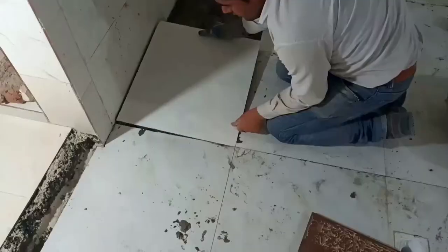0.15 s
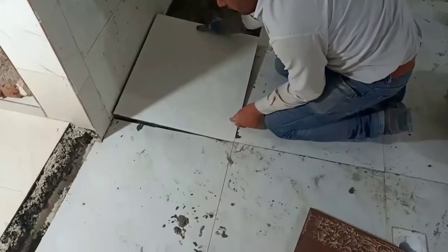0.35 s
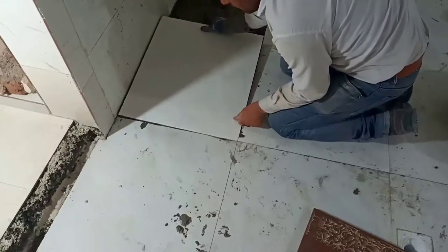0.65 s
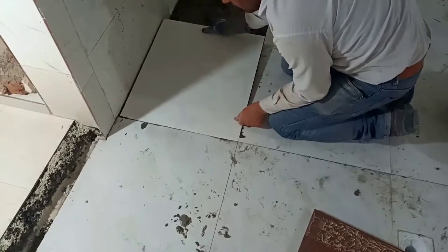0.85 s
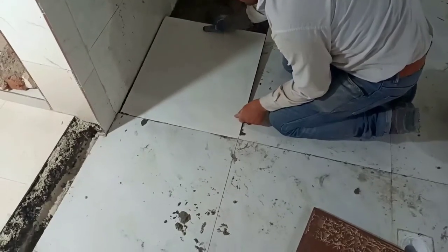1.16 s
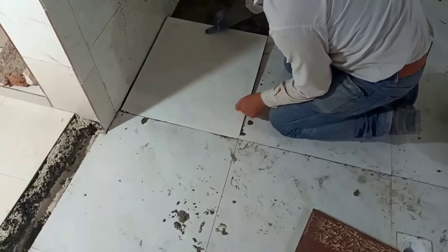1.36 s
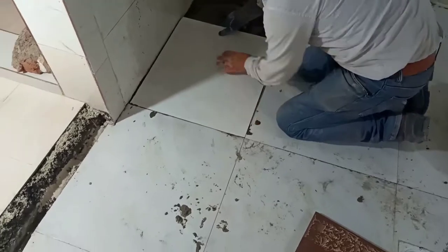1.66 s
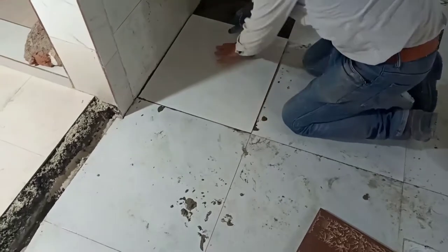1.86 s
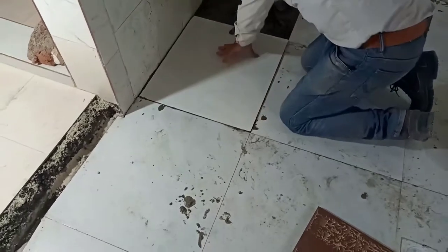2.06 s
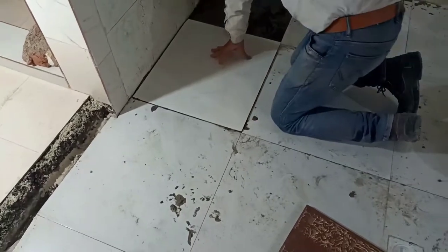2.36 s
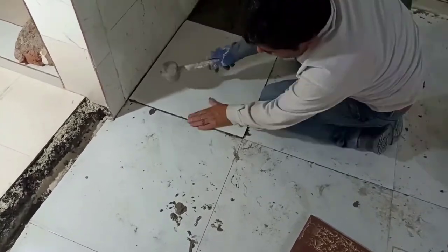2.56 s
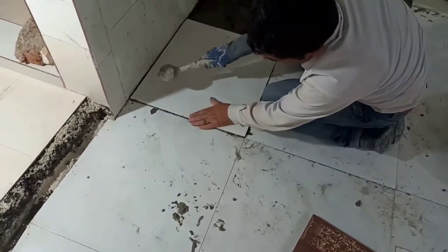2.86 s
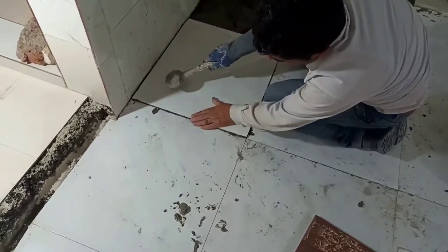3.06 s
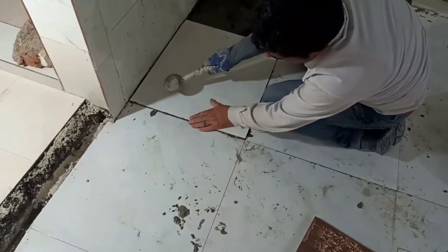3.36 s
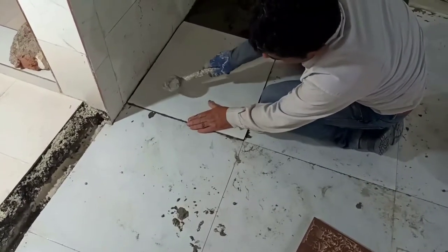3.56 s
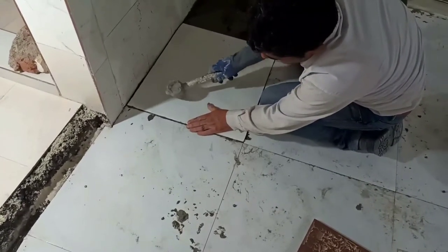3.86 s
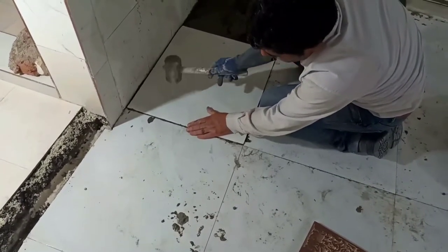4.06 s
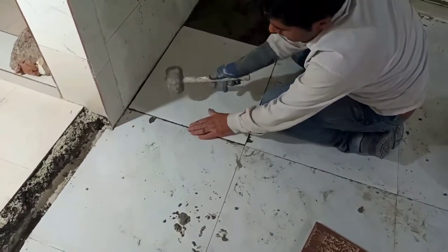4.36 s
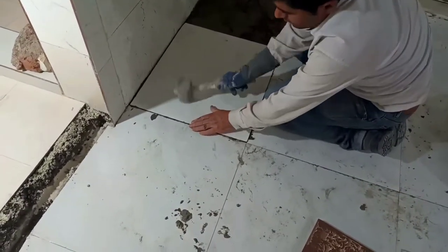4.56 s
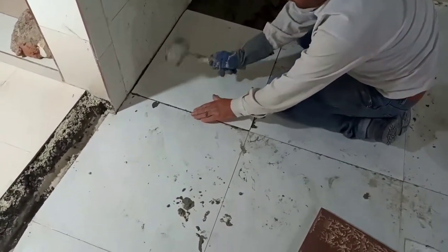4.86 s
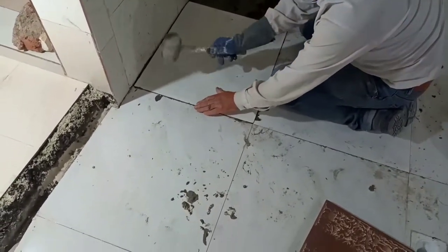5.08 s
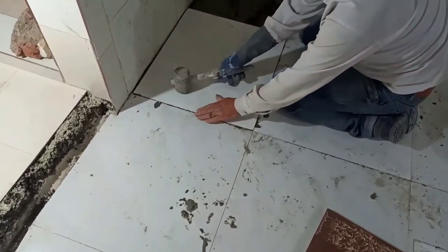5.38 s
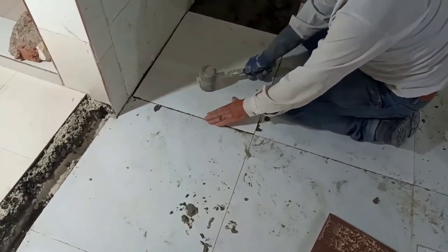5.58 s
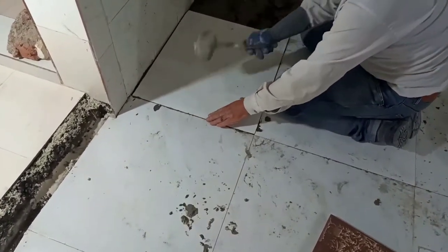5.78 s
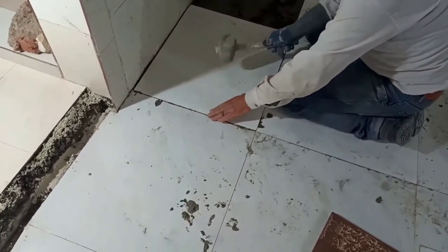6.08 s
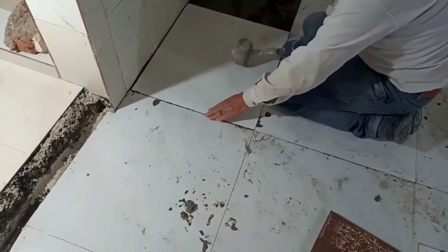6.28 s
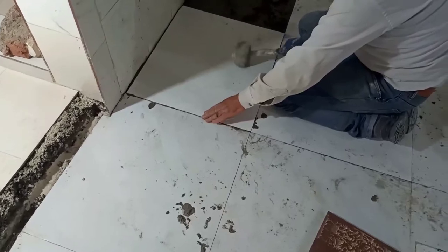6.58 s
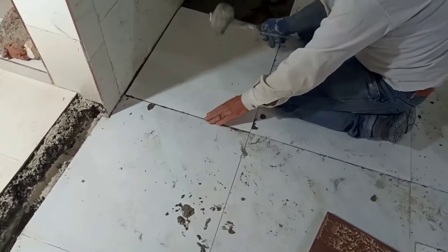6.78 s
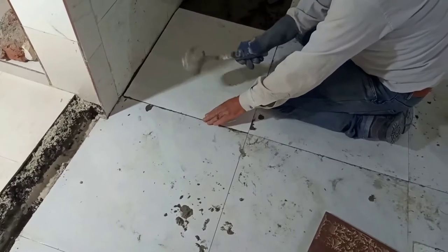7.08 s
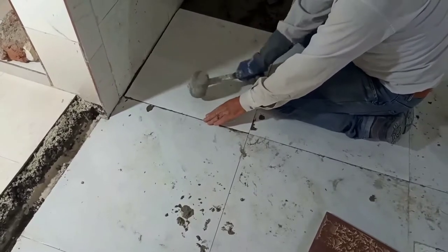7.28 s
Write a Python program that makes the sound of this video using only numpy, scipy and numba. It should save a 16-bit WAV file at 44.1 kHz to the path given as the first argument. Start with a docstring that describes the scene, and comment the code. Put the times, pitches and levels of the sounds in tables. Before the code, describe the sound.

A large ceramic tile grinds over grit, squeaking and clacking, before steady rubber mallet blows knock it into its bed in a bare room.

```python
"""A bare, tiled bathroom. A squeegee swishes briefly over a wet floor; then the scene changes: a large floor
tile is pushed into its mortar bed, grinding on grit, squealing and clacking against its neighbours. A rubber
mallet then taps it down, about three blows a second: the loose tile rocks and rings, the bedded one gives a
dead knock. A limiter flattens the harder blows and lets the room's long ring swell up."""
import sys
import numpy as np
from scipy import signal
from scipy.fft import rfft, irfft
from scipy.io import wavfile
from scipy.ndimage import uniform_filter1d, minimum_filter1d
from numba import njit

SR = 44100
rng = np.random.default_rng(int(sys.argv[2]) if len(sys.argv) > 2 else 0)


def waveform_to_disk(signal):
    """Save audio, clipped to [-1, 1], as 16-bit WAV at the path in sys.argv[1]."""
    frames = np.transpose(np.atleast_2d(signal))
    scaled = np.clip(frames, -1, 1) * 32767
    samples = np.round(scaled).astype(np.int16)
    wavfile.write(sys.argv[1], SR, samples)


N = 327663
T = np.arange(N) / SR

# grit scraped under the raised tile: (frequency [Hz], gain [dB])
SCRAPE_SPECTRUM = [(40, -24), (90, -30.5), (150, 2.5), (220, -7.5), (500, 2), (1000, -10), (1900, -17),
                   (2700, -23.5), (4200, -16.5), (7000, -17), (15000, -28.5)]


def undb(db):
    """Decibels to gain."""
    return 10 ** (np.asarray(db) / 20)


def unit(x):
    """Scale to rms 1."""
    return x / np.sqrt(np.mean(x ** 2))


def fade(t, t60):
    """Decay by 60 dB in t60 seconds."""
    return np.exp(-np.log(1000) * t / t60)


def add(track, s, x):
    """Mix x into the track from time s on."""
    i = max(int(s * SR), 0)
    track[i:i + len(x)] += x[:N - i]


def through(x, response):
    """Pass x through an impulse response."""
    return signal.fftconvolve(x, response)[:len(x)]


def shape(points, size=4096):
    """Minimum-phase impulse response of a (frequency [Hz], gain [dB]) curve."""
    hz, db = np.transpose(points)
    log_hz = np.log(np.fft.rfftfreq(size, 1 / SR) + 1)
    gain = undb(np.interp(log_hz, np.log(hz), db))
    cepstrum = irfft(np.log(gain))
    cepstrum[1:size // 2] *= 2
    cepstrum[size // 2 + 1:] = 0
    return irfft(np.exp(rfft(cepstrum)))


def resonances(modes, size=4096):
    """Impulse response of (frequency [Hz], width [Hz], gain [dB]) modes, silent at 0 Hz."""
    out, t = np.zeros(size), T[:size]
    for hz, width, db in modes:
        ring = np.real((1 + .5j * width / hz) * np.exp((2j * hz - width) * np.pi * t))
        out += undb(db) * 2 * np.pi * width / SR * ring
    return out


def pings(notes):
    """Decaying sines from (time [s], level [dB], pitch [Hz], t60 [s]) rows."""
    out, t = np.zeros(N), T[:SR]
    for s, db, hz, t60 in notes:
        add(out, s, undb(db) * np.sin(2 * np.pi * hz * t) * fade(t, t60))
    return out


def grains(per_s, spread_db):
    """Dense random clicks of uneven size, rms 1."""
    happens = rng.random(N) < per_s / SR
    polarity = rng.choice([-1, 1], N)
    size = undb(spread_db * np.minimum(rng.exponential(size=N), np.pi))
    return unit(happens * polarity * size)


def brighten(x, treble_db, corner_hz=2200):
    """High shelf: sharper contacts have more treble."""
    low = signal.lfilter(*signal.butter(1, corner_hz, fs=SR), x)
    return low + undb(treble_db) * (x - low)


def room_tone(level_db=-56):
    """The still air of the house, a soft steady noise."""
    # colour of the air: (frequency [Hz], gain [dB])
    air_spectrum = [(25, -45), (100, -14), (350, 20), (600, -0.5), (2000, -12), (7000, -16.5),
                    (15000, -18.5)]
    return undb(level_db) * unit(through(rng.standard_normal(N), shape(air_spectrum)))


def reflections(wet_db=-37, standing_db=-70, standing_t60=0.71,
                build_s=0.0031, early_db=-34, early_t60=0.01):
    """The room's answer at one spot: a scatter off the corner, a long diffuse ring, standing waves."""
    # the bathroom's ring: (frequency [Hz], t60 [s], relative level [dB])
    reverb_bands = [(49, 0.43, -14.5), (95, 0.77, 12.5), (182, 1.45, 1.5), (422, 1.27, 2.5),
                    (1113, 1.203, 0), (2000, 1.363, 3.5), (4300, 1.046, -0.5), (7860, 0.8, 1.5),
                    (15000, 0.69, 0)]
    # standing waves between its walls: (frequency [Hz], relative level [dB])
    standing_waves = [(96, -26), (133, 2), (157, 2.5), (189, 2), (235, 16), (281, 2.5), (347, 12.5),
                      (401, 16)]
    t = T[:2 * SR]
    centres_hz, t60s, levels_db = np.transpose(reverb_bands)
    noise = rfft(rng.standard_normal(len(t)))
    log_hz = np.log(np.fft.rfftfreq(len(t), 1 / SR) + 1)
    tail = np.zeros(len(t))
    for pick, t60, db in zip(np.eye(len(centres_hz)), t60s, levels_db):
        band = irfft(noise * np.interp(log_hz, np.log(centres_hz), pick))
        tail += undb(wet_db + db) * band * fade(t, t60)
    for hz, db in standing_waves:
        wave = np.sin(2 * np.pi * (hz * t + rng.random()))
        tail += undb(standing_db + db) * wave * fade(t, standing_t60)
    # small surfaces scatter only the short waves
    scatter = signal.lfilter(*signal.butter(2, 500, "high", fs=SR), rng.standard_normal(len(t)))
    build_up = 1 - np.exp(-(t / build_s) ** 2)
    return (tail + undb(early_db) * scatter * fade(t, early_t60)) * build_up


def bathroom(direct, send, spots=4):
    """Direct sound, near echoes and a reverb that keeps shifting as tiler and microphone move."""
    # echoes off the nearest walls and the kneeling body: (delay [ms], gain [dB])
    echoes = [(5.3, -31.5), (11.4, -14)]
    out = direct.copy()
    for ms, db in echoes:
        add(out, ms / 1000, undb(db) * direct)
    for k in range(spots):
        share = np.sqrt(2 / spots) * np.cos(np.pi * (k // 2 + 1) * T + k * np.pi / 2)
        out += share * through(send, reflections())
    return out


def clothes(band_hz=(90, 165), rub_db=-46, swell_db=-37.5, swell_s=1.79, spread_s=0.053):
    """Clothes rub dully all along, and more as the tiler gets up on his knees."""
    bandpass = signal.butter(2, band_hz, "band", fs=SR, output="sos")
    rub = unit(signal.sosfilt(bandpass, rng.standard_normal(N)))
    swell = np.exp(-((T - swell_s) / spread_s) ** 2)
    return rub * (undb(rub_db) + undb(swell_db) * swell)


def squeegee(swish_db=-41, drop_t60=0.0051):
    """A film of water fizzes under the rubber blade and spits a few drops."""
    # water under the blade: (frequency [Hz], gain [dB])
    swish_spectrum = [(40, -20), (130, -6), (260, 0), (600, -8.5), (1200, -16), (2600, -15.5),
                      (4200, -10.5), (7000, -10.5), (10000, -11.5), (15000, -17)]
    # drops spat from the blade: (time [s], level [dB], pitch [Hz])
    drops = [(.0175, -39, 6800), (0.0963, -26, 6600), (0.128, -29, 2840), (.131, -30.5, 2000)]
    fizz = unit(through(grains(per_s=3200, spread_db=2.5), shape(swish_spectrum)))
    return undb(swish_db) * fizz + pings([(*drop, drop_t60) for drop in drops])


def squeal(attack_s=0.033, release_s=0.054, sag_db_per_s=14, waver=0.0039):
    """The dragged tile sticks and slips on wavering notes that weaken as the drag slows."""
    # stick-slip notes: (time [s], length [s], pitch [Hz], level [dB])
    notes = [(.265, .374, 436, -32), (.255, .15, 668, -32.5), (1.55, 0.2, 352, -34.5)]
    out, t = np.zeros(N), T[:SR]
    for s, length, pitch_hz, db in notes:
        gate = np.clip(np.minimum(t / attack_s, (length - t) / release_s), 0, 1)
        drift = unit(uniform_filter1d(rng.standard_normal(len(t)), size=900))
        phase = 2 * np.pi * np.cumsum(pitch_hz * (1 + waver * drift)) / SR
        add(out, s, gate * undb(db - sag_db_per_s * t) * np.sin(phase))
    return out


def ceramic(contacts, s, uneven_db=1.5, laid_s=1.7, detune=0.05):
    """Tiny contacts at time s ring the tile; each spot favours other resonances."""
    # the ceramic's own resonances: (frequency [Hz], width [Hz], gain [dB])
    tile_modes = [(269, 4.3, 6.5), (334, 50, 0), (676, 146, -0.5), (863, 101, 0.5), (982, 86, -0.5),
                  (1066, 21, -8), (1397, 47, -2.5), (1614, 49, -11), (1753, 8.3, -7.5), (2020, 25, -30),
                  (2315, 23, -5), (2950, 300, -14), (3475, 84, -11.5), (3820, 99, -10.5), (4060, 96, -14.5),
                  (4640, 16, -17), (6250, 26, -11)]
    hz, width, db = np.transpose(tile_modes)
    shift, favour = rng.standard_normal((len(tile_modes), 2)).T
    if s > laid_s:  # on the mortar, each contact finds the tile supported differently
        hz = hz * (1 + detune * shift)
    return through(contacts, resonances(zip(hz, width, db + uneven_db * favour)))


def grinding(ring_db=12, scrape_db=10, settle_db=-16.5, settle_t60=1):
    """Each shove grinds a run of sand grains under the raised tile; a few more settle after it."""
    # shoves over the grit: (time [s], relative level [dB], length [s], treble [dB])
    shoves = [(0.2, -37.5, 0.2, -3.5), (0.258, -37.5, 0.094, -11), (0.395, -39.5, 0.15, -10),
              (0.647, -25.5, 0.034, -21), (0.722, -21.5, 0.025, -6.5), (0.887, -23, 0.029, -7.5),
              (1.174, -38, 0.042, -21), (1.471, -35, 0.2, -9.5), (1.54, -31, 0.029, -10),
              (1.717, -29.5, 0.13, -8.5), (1.769, -33, 0.02, -22), (1.961, -27, 0.033, -10),
              (2.053, -31.5, 0.025, -6), (2.565, -59, 0.15, -6)]
    out, t = np.zeros(N), T[:SR]
    grit, scrape = grains(per_s=1800, spread_db=3.0), shape(SCRAPE_SPECTRUM)
    for s, db, length, treble_db in shoves:
        progress = t / length
        push = 2 * np.e * progress * np.exp(-2 * progress) * np.exp(-(progress / 2) ** 4)
        settle = undb(settle_db) * (1 - np.exp(-progress)) * fade(t, settle_t60)
        grit = np.roll(grit, len(t) // 2)  # other grains for each shove
        contacts = undb(db) * brighten((push + settle) * grit[:len(t)], treble_db)
        add(out, s, undb(ring_db) * ceramic(contacts, s) + undb(scrape_db) * through(contacts, scrape))
    return out


def clacks(ring_db=15, crack_db=-2, rise_s=0.0022, t60=0.029):
    """Ceramic on ceramic: a brief crush of contacts rings the tile a little differently each time."""
    # the edge knocking against its neighbours: (time [s], relative level [dB], treble [dB])
    knocks = [(.649, -27.5, -22), (.656, -18, -23), (.693, -22, -16), (.733, -35, -9), (.9015, -21.5, -6),
              (.908, -15.5, -2), (1.262, -28, -8), (1.275, -26, -19), (1.301, -24, -7), (1.311, -24, -13),
              (1.381, -29.5, -0.5), (1.538, -25, 6), (1.547, -20, 2), (1.569, -23, -8), (1.64, -26, -2),
              (1.734, -28.5, 8), (1.958, -27, 10), (1.978, -21, 4.5), (2.144, -30, 5), (2.156, -33, 6),
              (2.504, -32, 2), (3.182, -18, -8.5), (3.472, -28, 5), (3.752, -28, -0.5), (3.763, -25, -5)]
    out, t, scrape = np.zeros(N), T[:SR // 8], shape(SCRAPE_SPECTRUM)
    envelope = (1 - np.exp(-t / rise_s)) * fade(t, t60)
    for s, db, treble_db in knocks:
        crush = rng.choice([-1., 1.], len(t))
        contacts = undb(db) * brighten(crush * envelope, treble_db)
        add(out, s, undb(ring_db) * ceramic(contacts, s) + undb(crack_db) * through(contacts, scrape))
    return out


def clinks():
    """The tile rings on single notes as an edge catches."""
    # ringing notes: (time [s], level [dB], pitch [Hz], t60 [s])
    notes = [(.655, -36, 229, 0.6), (.655, -26.5, 660.5, 0.5), (.652, -31, 2304, 0.11),
             (.9, -35.5, 228.6, .75), (.903, -22, 1410, 0.06), (.905, -26, 1500, 0.06),
             (1.535, -27, 980, 0.37), (2.86, -37, 2060, .06), (2.868, -27.5, 884, 0.055),
             (2.865, -33.5, 728, 0.08), (2.869, -31, 3130, .022), (3.171, -25, 900, .05),
             (3.172, -26, 1430, .04), (3.176, -32, 1814, .05), (3.468, -27.5, 1430, .04),
             (3.749, -26, 1480, .04), (3.757, -24, 1400, .035), (3.752, -26, 3600, .012)]
    return pings(notes)


def corner_snap(start_s=2.8575, level_db=-23, start_hz=3330, rise_s=0.0011, sag_hz_per_s=97000):
    """A corner snaps against the next tile under the first blow; its pitch sags as the contact eases."""
    t = np.maximum(T - start_s, 0)
    envelope = t / rise_s * np.exp(1 - t / rise_s)
    phase = 2 * np.pi * (start_hz - sag_hz_per_s * t / 2) * t
    return undb(level_db) * envelope * np.sin(phase)


def looseness(s, sinks_from_s=3.85, time_constant_s=0.31, at_last=0.13):
    """How freely the tile rocks at time s: 1 at first, less as it sinks into the mortar."""
    left = np.exp(-max(s - sinks_from_s, 0) / time_constant_s)
    return at_last + left * (1 - at_last)


def rocking(t, loose, rock_hz=177, longest_s=0.016):
    """The slab see-saws until it lands; the firmer its bed, the weaker and shorter the rocking."""
    progress = np.minimum(t / (longest_s * loose), 1)
    arch = 2 * np.sqrt(progress * (1 - progress))
    return -loose * arch * np.cos(2 * np.pi * rock_hz * t)


def chatter(t, loose, bedded_t60=0.073, loose_t60=0.058, flex_hz=185, depth=0.75, rise_s=0.0037):
    """Envelope of an edge touching its neighbour once per flex; it builds more slowly on a loose tile."""
    t60 = bedded_t60 + loose * (loose_t60 - bedded_t60)
    flex = 1 + depth * np.cos(2 * np.pi * flex_hz * t)
    attack = 1 - np.exp(-t / (rise_s * (1 + 2 * loose)))
    return fade(t, t60) * flex * attack


def air_puff(force, s, around_s=4.62, spread_s=0.37, hz=39.7, gain_db=-17):
    """The blows that drive the slab down into the mortar push out a deep puff of air."""
    driven = np.exp(-((s - around_s) / spread_s) ** 2)
    return driven * through(force, resonances([(hz, hz, gain_db)]))


def mallet(knock_db=-10, hollow_db=-5, rocking_db=-9, grit_db=-9, ring_db=-4, open_edge_db=2.5):
    """Rubber blows knock the slab, crunch grit and ring the tile while loose: (direct, reverb send)."""
    # blows: (time [s], force [dB], contact [ms], edge rattle re force [dB], onset re rattle [dB],
    # rattle treble [dB], reverb send [dB])
    blows = [(2.8546, -8.5, 3.1, -2, -19, 1, -1.5), (3.163, -2, 3.7, 1, -30, -4.5, -4),
             (3.4572, -5.5, 4.7, 1, -30, -2.5, -1.5), (3.7365, -4, 3.27, 3.5, -34, -5, -4),
             (4.0238, -7, 7.5, -19, -4, -10, -1), (4.355, 10, 3.3, -19, -11, -9, -6),
             (4.716, 13, 1.7, -29, 7, -27, -6), (5.0492, 27.5, 2.34, -15, -22, -9.5, -3),
             (5.3465, 23, 1.9, -10, -32, -6, -3), (5.628, -2.5, 1.06, -14, -6, -7, 1),
             (6.0968, 14.5, 2.51, -15, -6.5, 0, -2), (6.404, 19.5, 1.76, -8.5, -4, -2.5, -0.5),
             (6.683, 19, 2.43, -17, 0, -1, -2.5), (7.0905, 15.5, 2.56, -11, -7.5, -5, -2.5),
             (7.402, 21, 1.74, -6.5, -12, -0.5, -0.5)]
    # the bedded slab's dead, woody knock, too damped to ring: (frequency [Hz], gain [dB])
    slab_spectrum = [(35, -7.5), (80, -26), (130, -2.5), (185, 6), (270, 5.5), (480, 4), (780, -5.5),
                     (1230, -1.5), (1750, -32), (2250, -18), (3000, -6), (15000, -30)]
    # grit crushed by a blow: (frequency [Hz], gain [dB])
    crunch_spectrum = [(40, -29), (150, -1.5), (450, 6.5), (800, 6.5), (1600, 0), (2700, -6.5),
                       (4200, -1.5), (7000, -5.5), (15000, -15.5)]
    direct, send, t = np.zeros(N), np.zeros(N), T[:SR // 6]
    grit = grains(per_s=7800, spread_db=11.0)
    slab, crunch = shape(slab_spectrum), shape(crunch_spectrum)
    for k, (s, db, contact_ms, rattle_db, onset_db, treble_db, send_db) in enumerate(blows):
        contact_s, loose = contact_ms / 1000, looseness(s)
        # rubber is squeezed faster than it springs back
        squeeze = 4.2 * t / contact_s
        force = -squeeze * np.exp(1 - squeeze)
        # the knock is weaker while the slab lies hollow
        knock = undb(knock_db + loose * hollow_db) * through(force, slab)
        thud = knock + undb(rocking_db) * rocking(t, loose) + air_puff(force, s)
        rattle = chatter(t, loose) * grit[k * len(t):(k + 1) * len(t)]
        strength = np.linalg.norm(rattle)
        # a short crack opens each blow; at 4.716 s a dull bite, like the microphone overloading
        onset = undb(onset_db) * strength * signal.unit_impulse(len(t))
        # the rattle reaches the room as one even splash, stronger from a loose tile's open edges
        splash = undb(loose * open_edge_db) * strength * signal.unit_impulse(len(t), len(t) // 16)
        for track, clicks, level_db in ((direct, rattle + onset, db), (send, splash, db + send_db)):
            contacts = undb(rattle_db) * brighten(clicks, treble_db)
            crushed = undb(grit_db) * through(contacts, crunch)
            ring = loose * undb(ring_db) * ceramic(contacts, s)
            add(track, s, undb(level_db) * thud)
            add(track, s + contact_s / 2, undb(level_db) * (crushed + ring))
    return direct, send


def scene(squeegee_end_s=0.161, tiling_start_s=0.201, laying_end_s=2.6, fade_s=0.04, snap_send_db=-6.5):
    """The squeegee, then the scene changes: the tile being laid, then the tapping."""
    handling = grinding() + clacks() + clinks()
    snap = corner_snap()
    blows, blows_send = mallet()
    direct = handling + snap + blows
    send = handling + undb(snap_send_db) * snap + blows_send
    # the laying fades out quickly, reverb and all, just ahead of the tapping
    laying_fade = np.clip((laying_end_s - T) / fade_s, 0, 1)
    tapping_gate = T >= laying_end_s - fade_s
    laying = laying_fade * bathroom(direct, send)
    tapping = bathroom(tapping_gate * direct, tapping_gate * send)
    tiling = laying + tapping + squeal() + clothes() + room_tone()
    return (squeegee() * (T < squeegee_end_s) + tiling * (T > tiling_start_s))[None]


@njit
def held_peak(magnitude, ceiling, release):
    """Jumps to each peak above the ceiling and sinks back by the release factor every sample."""
    out, held = np.empty(len(magnitude)), ceiling
    for i in range(len(magnitude)):
        held = max(magnitude[i], held * release, ceiling)
        out[i] = held
    return out


def limiter(x, ceiling_db=-16, release_db_per_s=62, window=65):
    """Ducks just ahead of each peak, then recovers about as fast as the room dies away."""
    ceiling, release = float(undb(ceiling_db)), float(undb(-release_db_per_s / SR))
    gain = ceiling / held_peak(np.abs(x), ceiling, release)
    return x * uniform_filter1d(minimum_filter1d(gain, window), window)


def record(dry):
    """Microphone colour, the limiter and a steep low-pass at 15.5 kHz."""
    # the microphone's treble falls away in steps: (frequency [Hz], gain [dB])
    mic_response = [(20, -11), (4650, -1), (4850, -7), (6050, -7), (6250, -1), (7650, 0), (7850, -7.5),
                    (8480, -4.5), (8700, -21), (15500, -16)]
    limited = limiter(through(dry[0], shape(mic_response)))
    lowpass = signal.ellip(8, .2, 70, 15500, fs=SR, output="sos")
    return signal.sosfilt(lowpass, limited)[None]


dry = scene()
out = record(dry)
waveform_to_disk(out)
```